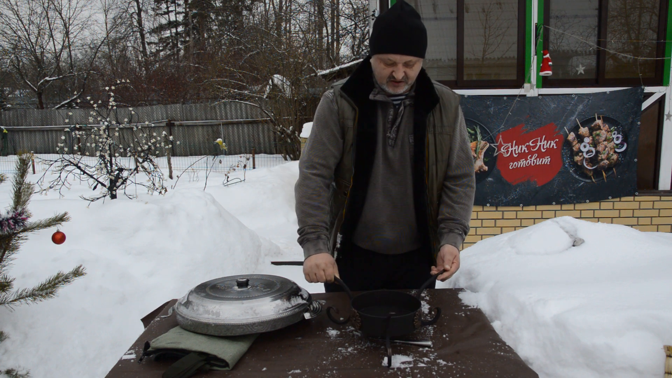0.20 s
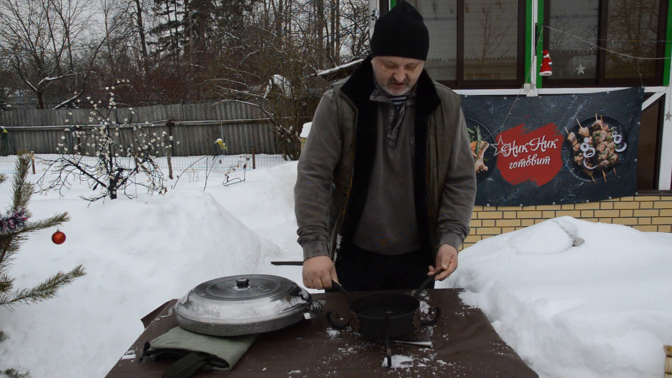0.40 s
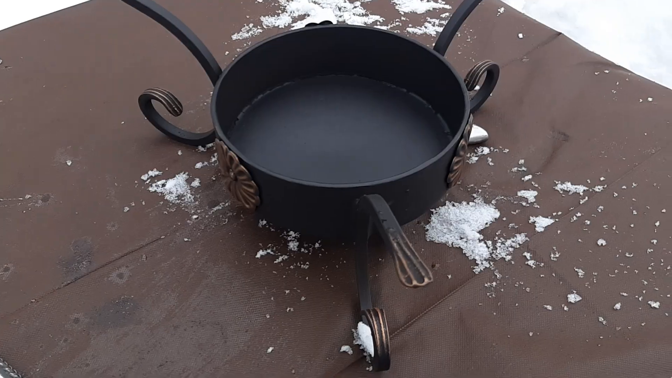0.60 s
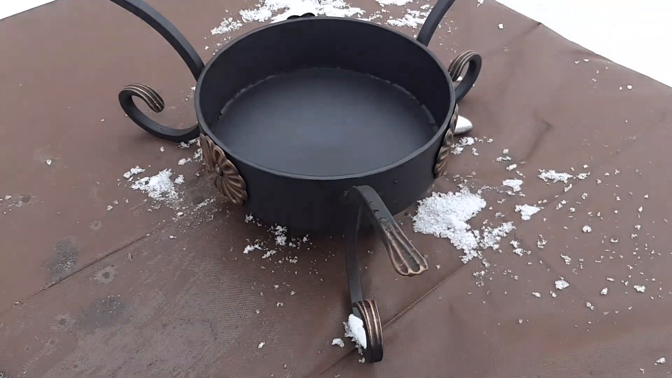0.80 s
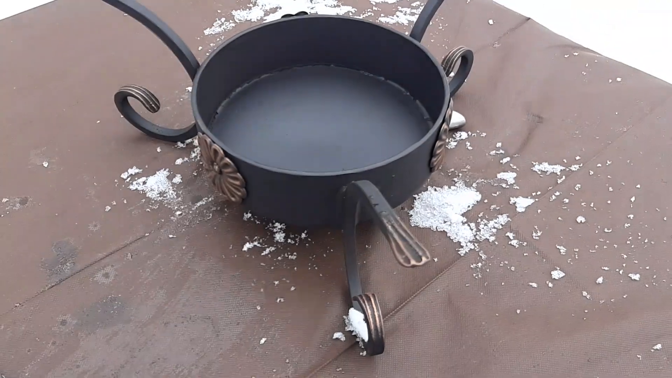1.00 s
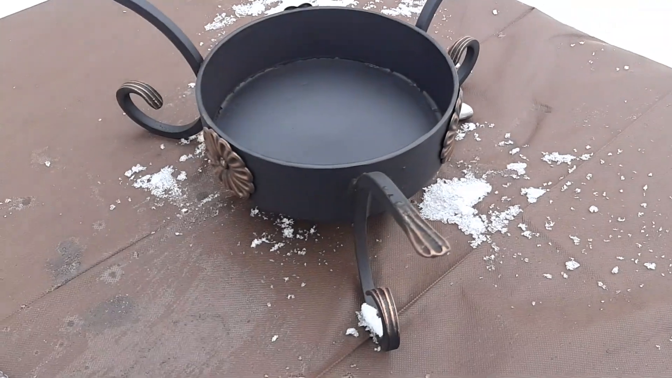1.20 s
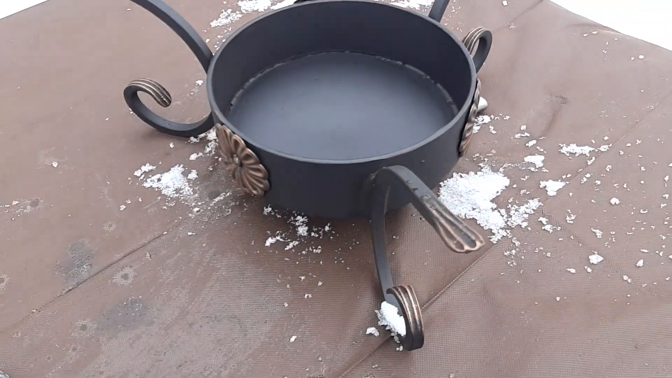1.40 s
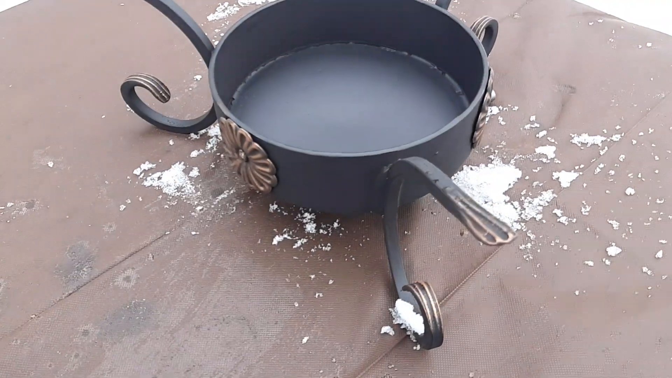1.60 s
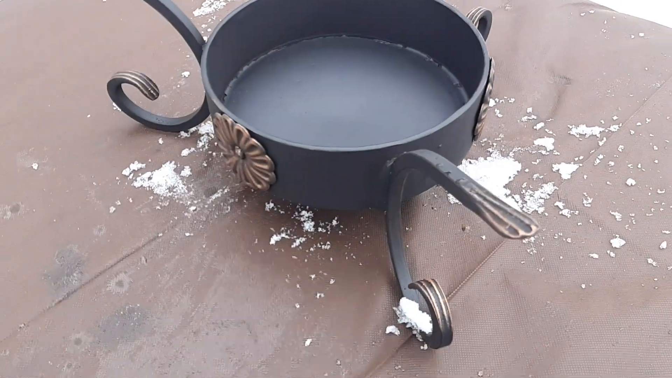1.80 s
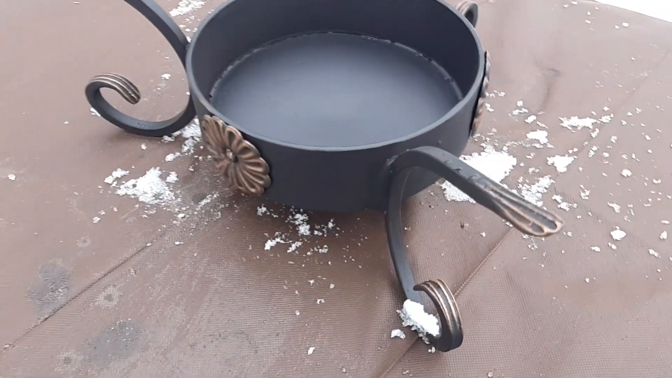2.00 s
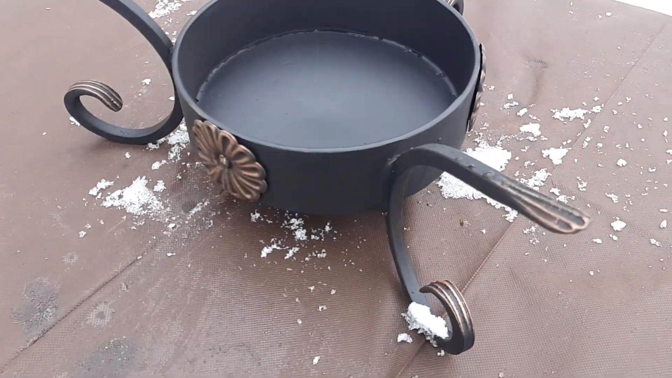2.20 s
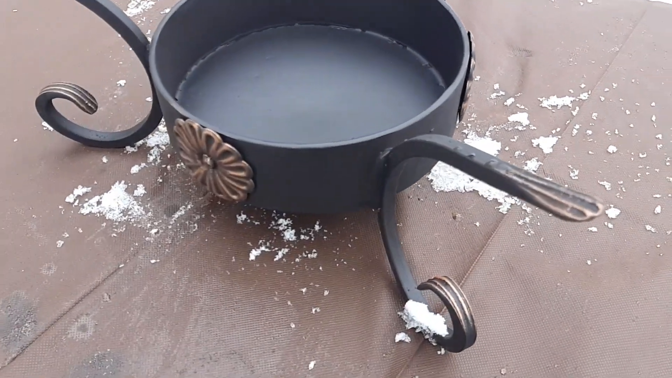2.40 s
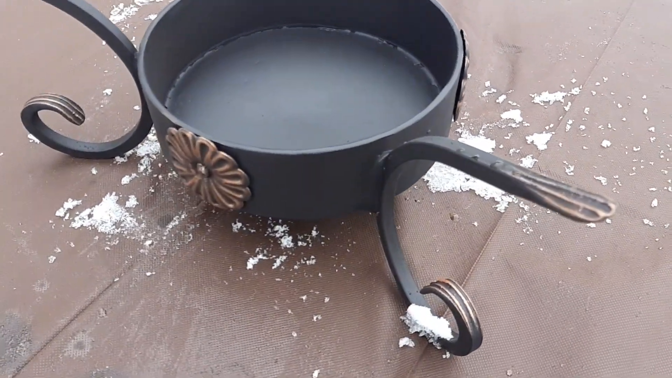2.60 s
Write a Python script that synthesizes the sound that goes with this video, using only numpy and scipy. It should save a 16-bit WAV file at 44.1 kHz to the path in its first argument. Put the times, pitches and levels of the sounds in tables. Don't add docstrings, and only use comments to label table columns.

```python
import sys
import numpy as np
from scipy import signal
from scipy.fft import rfft, irfft, next_fast_len
from scipy.io import wavfile
from scipy.ndimage import uniform_filter1d

SR = 44100
rng = np.random.default_rng(int(sys.argv[2]) if len(sys.argv) > 2 else 0)


def ratio_of_db(decibels):
    return 10 ** (np.asarray(decibels, float) / 20)


def inscribe(sig):
    pcm = np.round(np.clip(np.atleast_2d(sig).T, -1, 1) * 32767)
    wavfile.write(sys.argv[1], SR, pcm.astype(np.int16))


N = 114660

# f/Hz, level/dB
YARD_SPECTRUM = [(25, 4.5), (300, -7), (900, -1.5), (1700, -4), (2500, -11.5), (3650, -12.5), (4600, -22.5),
                 (8000, -26.5), (16000, -28)]
# f/Hz, correlation/1
YARD_ALIKE = [(100, 0.99), (400, 0.99), (1300, 1), (3000, 0.99), (7000, 0.7), (15000, 0.56)]
# f/Hz, level/dB
AIR_SPECTRUM = [(25, -5.5), (190, -5), (500, -10.5), (1000, -4.5), (2000, -6), (2700, -13), (4200, -11.5),
                (6000, -23), (7500, -33)]
# f/Hz, correlation/1
AIR_ALIKE = [(60, 0.86), (240, 0.56), (950, -0.23), (3770, 0.11), (15000, -0.022)]
# f/Hz, level/dB
HISS_SPECTRUM = [(5000, -5), (7600, -21), (10500, 1), (12500, -4.5), (16000, -2)]
# f/Hz, level/dB
FLOOR_TOP = [(15850, 0), (15950, -70)]
# t/s, f/Hz, level/dB
PEEP = [
    (0.143, 4690, -53.5),
    (0.187, 4490, -39.5),
    (0.205, 4540, -55),
]
# t/s, end t/s, f/Hz, end f/Hz
SWEEPS = [
    (0.66, 0.671, 15800, 8250),
    (0.69, 0.723, 15800, 8000),
    (0.725, 0.75, 9400, 16000),
    (0.777, 0.795, 8000, 15900),
]

# t/s, peak level/dB, t60/s, tilt/(dB/octave), L-R/dB
CLICKS = [(1.2935, -37, 0.02, 4.5, -14), (1.8005, -38.5, 0.029, 3, -12), (1.8297, -16, 0.015, 1, -7.5),
          (1.855, -35, 0.031, 8, -2), (2.025, -10, 0.025, 0.5, -9.5), (2.0462, -25, 0.02, 2, 3),
          (2.0726, -37.5, 0.035, -4.5, -2), (2.105, -40, 0.012, 2, -5), (2.22, -9, 0.023, -0.5, -8.5),
          (2.239, -28.5, 0.033, 0, 4), (2.2974, -34.5, 0.014, -1, 0), (2.3416, -17, 0.037, -2, -8),
          (2.5042, -35.5, 0.014, -3.5, -8.5), (2.5271, -25.5, 0.037, -3, -8)]
# f/Hz, level/dB
CASING_SPECTRUM = [(300, -32), (900, -12), (2100, -7.5), (3200, -11.5), (4670, -3), (6360, -1.5),
                   (7800, -7), (10600, -1), (15600, -10.5)]
# f/Hz, level/dB, t60 over the rattle's/1
SHELL_MODES = [(2140, 0.5, 0.42), (3480, 1.5, 0.64), (4730, 4.5, 0.41), (5770, 4.5, 0.48),
               (6350, 7.5, 0.24), (9320, -1, 0.21), (10200, -1, 0.31), (11300, 5.5, .2)]
# t/s, peak level/dB, t60/s, tilt/(dB/octave), L-R/dB
CLACKS = [
    (0.88, -29.5, 0.012, -2.5, -3.5),
    (0.986, -42, 0.009, 4.5, -8),
    (1.391, -37, 0.009, -3, -12),
    (1.528, -18.5, 0.022, -2, -9),
    (1.548, -40, .015, -4, -4),
    (1.569, -37, 0.028, -3, 8),
    (1.5868, -18.5, 0.021, -1, -6.5),
    (2.1842, -25, 0.0059, -0.5, -7),
]
# f/Hz, level/dB
CLACK_SPECTRUM = [(300, -82), (1200, -4), (2000, -4), (3600, -1), (6000, -4), (8000, -2.5), (15600, -7)]
# f/Hz, level/dB, t60 over the rattle's/1
LID_MODES = [(1860, 4.5, 0.84), (3220, 3, 1), (3620, 4, 0.83), (4740, 5.5, 0.79), (6400, 3, 0.62),
             (10300, 3, 0.32)]
# t/s, level/dB, f/Hz, L-R/dB
TAPS = [
    (1.7299, -14.5, 1840, -2.5),
    (2.2048, -43, 795, 4),
    (2.2087, -32.5, 840, -5),
]
# t/s, level/dB, f/Hz
THUDS = [
    (0.831, -47.5, 138),
    (1.291, -51, 233),
    (1.528, -42, 233),
    (1.571, -44, 234),
    (1.585, -38, 226),
    (1.644, -48, 223),
    (1.83, -49, 233),
    (2.035, -45, 226),
    (2.22, -38.5, 227),
    (2.344, -50.5, 226),
]
# t/s, length/s, level/dB, L-R/dB
RUBS = [
    (1.295, 0.12, -58.5, -16.5),
    (1.361, 0.097, -61, -11),
    (1.534, 0.08, -63.5, -9),
    (2.04, 0.031, -47.5, 4.5),
    (2.243, 0.014, -43, 2.5),
    (2.257, 0.034, -56.5, 0),
]
# f/Hz, level/dB
RUB_SPECTRUM = [(1500, -2.5), (4000, -1), (6200, 1.5), (8000, -7), (11000, 0), (16000, -14)]

# f/Hz, level/dB, t60/s
FOOT_A_MODES = [(89, -17.5, 0.57), (110.6, 2, 0.33), (226, -7.5, 0.87), (293, -24.5, 0.11),
                (542, -13.5, 0.11), (628, 0.5, 0.035), (754, -25.5, 0.156), (1474, -15.5, 0.044)]
# f/Hz, level/dB, t60/s
FOOT_B_MODES = [(87.3, -28.5, 0.96), (131.3, 2, 0.26), (152, -17, 0.42), (253.6, -13.5, 0.52),
                (422.3, -21.5, 0.091), (599.5, -10, 0.1), (744, -17, 0.17), (674, -6, .03)]
# f/Hz, level/dB, t60/s
FOOT_C_MODES = [(63, -11, 0.36), (88, -3, 1.6), (108, -1, 0.396), (227, 1.5, 2.1), (315, -9.5, 0.12)]
# t/s, level/dB, time until weight settles/s, level change then/dB
LANDS_A = [
    (0.2403, -7.5, 0.042, -29.5),
    (0.2663, -14.5, 0.022, -16),
]
LANDS_B = [
    (0.4441, -3, 0.035, -13),
    (0.5025, -17.5, 0.019, -4),
]
LANDS_C = [
    (.289, -17, 0.0455, -19.5),
    (0.371, -28.5, 0.0427, -3.5),
]
# f/Hz, level/dB
BOOM_SPECTRUM = [(45, -34), (80, 7), (200, 12), (700, -13), (1500, -64.5)]
# t/s, level/dB, f/Hz, t60/s
KNOCKS = [
    (.2545, -18, 840, 0.054),
    (.2595, -13, 550, 0.043),
    (.2685, -25.5, 1960, .015),
    (.461, -33, 1100, .05),
    (.4905, -35, 600, 0.025),
    (.4455, -21, 1300, 0.009),
    (0.35, -27, 500, .02),
    (.424, -46, 3300, .06),
    (.2415, -15, 700, .015),
]
# t/s, level/dB
PUSHES = [
    (0.2397, -9),
    (0.4445, -4.5),
]
# t/s, level/dB, t60/s
CRACKS = [
    (0.2383, -22.5, 0.027),
    (0.4438, -29.5, 0.025),
]
# f/Hz, level/dB
CRACK_SPECTRUM = [(400, -51), (1000, 7), (2000, 0.5), (3800, -1), (6000, -20), (7400, -17.5),
                  (15000, -25.5)]
# t/s, level/dB
SCROLL_RING = [
    (0.24, -43),
    (.252, -78),
    (0.271, -49),
    (.3, -60),
    (.34, -69),
]
# t/s, level/dB
DUCKS = [
    (0.243, -6.5),
    (0.447, -10.5),
]
# f/Hz, level/dB
BAND = [(30, -10), (60, 0), (16000, 0), (16500, -10), (16750, -50)]

CUT_S, DIP_S, RESUME_S = 0.5505, 0.571, 0.5835
SEAT_S = 0.0012
RISE_S = 0.0002


def unit(x):
    return x / np.sqrt(np.mean(x ** 2) + 1e-20)


def along(points, hz):
    f, v = np.transpose(points)
    return np.interp(np.log(hz + 1), np.log(f + 1), v)


def colour(x, points, tilt_db=0, pad=2048):
    n = x.shape[-1]
    m = next_fast_len(n + pad)
    hz = np.fft.rfftfreq(m, 1 / SR)
    gain_db = along(points, hz) + tilt_db * np.log2(np.maximum(hz, 1500) / 4000)
    return irfft(rfft(x, m) * ratio_of_db(gain_db), m)[..., :n]


def causal(x, points, tilt_db):
    response = rfft(colour(signal.unit_impulse(4096), points, tilt_db, pad=0))
    cepstrum = irfft(np.log(np.abs(response) + 1e-6))
    cepstrum[1:2048] *= 2
    cepstrum[2049:] = 0
    impulse = irfft(np.exp(rfft(cepstrum)))
    return signal.fftconvolve(x, impulse[None], axes=1)[:, :x.shape[-1]]


def add(out, s, x, pan_db=0, lead_s=0):
    length = x.shape[-1]
    stereo = np.broadcast_to(x, (2, length))
    for ch, (share, late_s) in enumerate([(0.68, lead_s), (-0.48, 0.0000096)]):
        part = out[ch, round((s + late_s) * SR):][:length]
        part += ratio_of_db(share * pan_db) * stereo[ch, :len(part)]


def rush(spectrum, alike, patchy_db):
    hz, _, z = signal.stft(rng.standard_normal((2, N)), SR, nperseg=2048)
    field = uniform_filter1d(rng.standard_normal(z.shape[1:]), size=40, axis=0)
    field = uniform_filter1d(field, size=3, axis=1)
    gain_db = patchy_db * unit(field) + along(spectrum, hz)[:, None]
    turn = np.arccos(np.clip(along(alike, hz), -1, 1))[:, None] / 2
    mid, side = z * ratio_of_db(gain_db) * [np.cos(turn), np.sin(turn)]
    return unit(signal.istft(np.array([mid + side, mid - side]), nperseg=2048)[1][:, :N])


def yard():
    return ratio_of_db(-36.5) * colour(rush(YARD_SPECTRUM, YARD_ALIKE, patchy_db=1.13), FLOOR_TOP)


def camera_air():
    air = ratio_of_db(-52) * rush(AIR_SPECTRUM, AIR_ALIKE, patchy_db=1.5)
    hiss = ratio_of_db(-63.5) * rush(HISS_SPECTRUM, [(8000, 0.01)], patchy_db=0.4)
    fade_in = np.clip((np.arange(N) / SR - RESUME_S) / 0.00041, 0, 1)
    return fade_in * colour(air + hiss, FLOOR_TOP)


def bird():
    s, hz, db = np.transpose(PEEP)
    t = np.arange(N) / SR
    edge = np.clip(np.minimum(t - s[0], s[-1] - t) / 0.0049, 0, 1)
    phase = 2 * np.pi * np.cumsum(np.interp(t, s, hz)) / SR
    return edge * ratio_of_db(np.interp(t, s, db)) * np.sqrt(2) * np.sin(phase)


def focus_motor():
    out = np.zeros((2, N))
    for s, end_s, hz, end_hz in SWEEPS:
        glide_hz = np.linspace(hz, end_hz, round((end_s - s) * SR))
        whistle = np.sin(2 * np.pi * np.cumsum(glide_hz) / SR)
        add(out, s, ratio_of_db(-66) * signal.windows.tukey(len(glide_hz)) * whistle)
    return out


def finger_rubs(out, t):
    for s, length_s, db, pan_db in RUBS:
        gritty = rng.standard_normal((2, len(t))) * ratio_of_db(5 * rng.standard_normal(len(t)))
        shape = np.clip(np.minimum(t / 0.0011, 2.5 * (1 - t / length_s)), 0, 1) * ratio_of_db(-3 * t / length_s)
        add(out, s, ratio_of_db(db) * shape * colour(unit(colour(gritty, RUB_SPECTRUM)), FLOOR_TOP), pan_db)


def casing_thuds(out, t):
    for s, db, hz in THUDS:
        thud = np.sin(2 * np.pi * hz * t) * (1 - np.exp(-t / 0.0022))
        add(out, s, ratio_of_db(db + 6 - 60 * t / 0.057) * thud, -2.5)


def finger_taps(out, t):
    early_s = 1 / 100
    for s, db, hz, pan_db in TAPS:
        swell = hz * t * (1 - np.exp(-4 * hz * t))
        tap = np.sin(2 * np.pi * hz * t) * swell * np.exp(-2 * np.pi * 0.9 * hz * t)
        tap = colour(np.roll(tap, SR // 100), [(60, -20), (300, 0), (1.49 * hz, 0), (5.1 * hz, -30)])
        peak = np.abs(tap).max()
        echo = colour(tap, [(1000, 1), (2500, -5)])
        add(out, s - early_s - 0.5 / hz, ratio_of_db(db) * tap / peak, pan_db)
        add(out, s - early_s + 0.0091, ratio_of_db(db - 22) * echo / peak, pan_db)


def casing_clicks(out, t, clicks, spectrum, modes, hold):
    edge_hz = 7400
    rise = 1 - np.exp(-t / RISE_S)
    for s, db, t60, tilt_db, pan_db in clicks:
        noise = rng.standard_normal((3, len(t)))
        rattle = (noise[0] + 1.57 * noise[1:]) * rise
        freed_s = np.maximum(t - hold * t60, 0)
        burst = colour(rattle * ratio_of_db(-60 * freed_s / t60), [(edge_hz * 0.75, 0), (edge_hz * 1.66, -25)])
        burst = burst + rattle * ratio_of_db(-60 * t / (0.3 * t60))
        burst[:, round(RISE_S * SR * 2)] += 11
        for hz, level_db, fade in modes:
            mode_db = level_db + 1.5 * rng.standard_normal() - 60 * t / (fade * t60)
            burst = burst + rise * ratio_of_db(mode_db) * np.sin(2 * np.pi * (hz * t + rng.random()))
        burst = causal(burst, spectrum, tilt_db)
        add(out, s + 0.0019, ratio_of_db(db) * burst / np.abs(burst).max(), pan_db, lead_s=0.00045)


def fingers():
    out, t = np.zeros((2, N)), np.arange(SR // 8) / SR
    finger_rubs(out, t)
    casing_thuds(out, t)
    finger_taps(out, t)
    casing_clicks(out, t, CLICKS, CASING_SPECTRUM, SHELL_MODES, hold=0.0041)
    casing_clicks(out, t, CLACKS, CLACK_SPECTRUM, LID_MODES, hold=0.13)
    return out


def scroll_work():
    ring_hz, wide_hz = 7520, 120
    s, db = np.transpose(SCROLL_RING)
    band = [(ring_hz - 3 * wide_hz, -40), (ring_hz, 0), (ring_hz + 3 * wide_hz, -40)]
    level_db = np.interp(np.arange(N) / SR, s, db, -200, -200)
    return ratio_of_db(level_db) * unit(colour(rng.standard_normal(N), band))


def steel_contact(out, t):
    seat = 1 - np.exp(-t / SEAT_S)
    for s, db, hz, t60 in KNOCKS:
        add(out, s, ratio_of_db(db - 60 * t / t60) * np.sin(2 * np.pi * hz * t) * seat)
    push_s = 0.0006
    for s, db in PUSHES:
        add(out, s - 3 * push_s, ratio_of_db(db) * np.exp(-(t / push_s - 3) ** 2))
    for s, db, t60 in CRACKS:
        crack = unit(colour(rng.standard_normal(len(t)), CRACK_SPECTRUM))
        add(out, s, ratio_of_db(db - 60 * t / t60) * seat * crack)
    slam_s, slam_fade_s = 0.4464, 0.0005
    since_s = t - 6 * slam_fade_s
    slam = np.sign(since_s) * np.exp(-np.abs(since_s) / slam_fade_s)
    add(out, slam_s + since_s[0], -ratio_of_db(-9) * uniform_filter1d(slam, size=9))


def table_blows(out, t):
    feet = [(FOOT_A_MODES, LANDS_A), (FOOT_B_MODES, LANDS_B), (FOOT_C_MODES, LANDS_C)]
    for modes, lands in feet:
        ring = -sum(ratio_of_db(db - 60 * t / t60) * np.sin(2 * np.pi * hz * t) for hz, db, t60 in modes)
        for s, db, free_s, lost_db in lands:
            boom = ratio_of_db(-9.5 - 60 * t / 0.27) * unit(colour(rng.standard_normal(len(t)), BOOM_SPECTRUM))
            settle_db = lost_db * np.clip((t - free_s) / 0.0013, 0, 1)
            add(out, s, ratio_of_db(db) * (ratio_of_db(settle_db) * ring + boom) * (1 - np.exp(-t / SEAT_S)))


def stand():
    out, t = np.zeros((2, N)), np.arange(SR // 2) / SR
    table_blows(out, t)
    steel_contact(out, t)
    return out + scroll_work()


def gain_control(x):
    t = np.arange(N) / SR
    duck_db = 0
    for s, db in DUCKS:
        duck_db = duck_db + db * np.clip((t - s) / 0.0093, 0, 1) * np.exp(-np.maximum(t - s, 0) / 0.081)
    ducked = ratio_of_db(duck_db) * x
    return ducked / (1 + np.abs(ducked / 0.78) ** 6) ** (1 / 6)


def first_shot():
    times_s = [CUT_S - 0.001, CUT_S, DIP_S - 0.002, DIP_S, RESUME_S, RESUME_S + 0.001]
    cut_db = np.interp(np.arange(N) / SR, times_s, [0, -38, -38, -50, -50, -200])
    return ratio_of_db(cut_db) * gain_control(yard() + bird() + stand())


def second_shot():
    return camera_air() + focus_motor() + fingers()


def scene():
    return first_shot() + second_shot()


def band_limit(x):
    return signal.sosfilt(signal.butter(12, 17020, fs=SR, output="sos"), x)


def record(dry):
    mix = colour(dry, BAND)
    return band_limit(mix)


dry = scene()
out = record(dry)
inscribe(out)
```